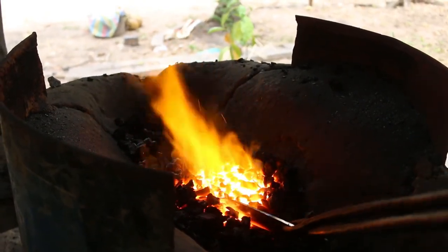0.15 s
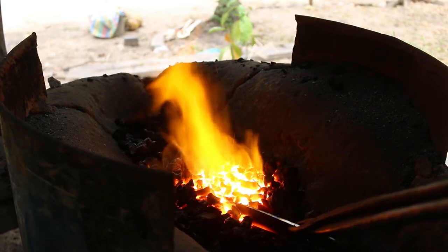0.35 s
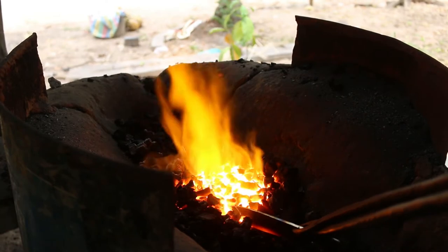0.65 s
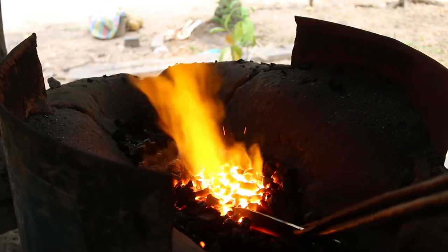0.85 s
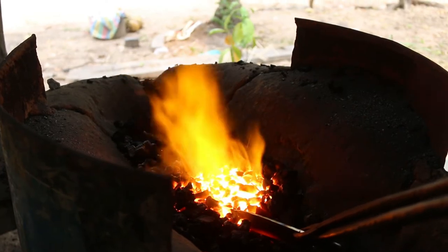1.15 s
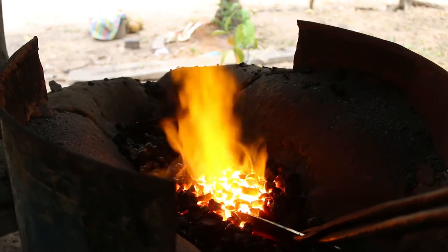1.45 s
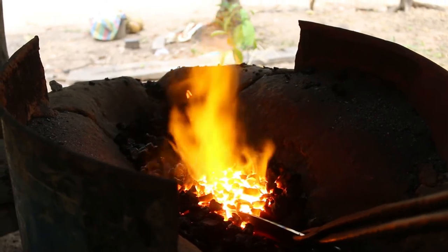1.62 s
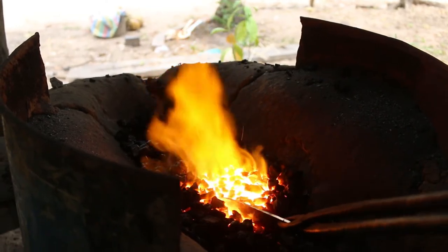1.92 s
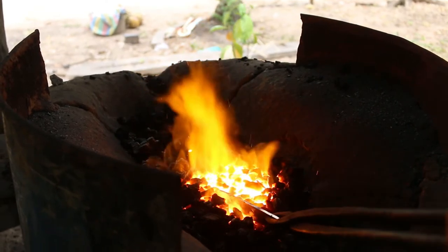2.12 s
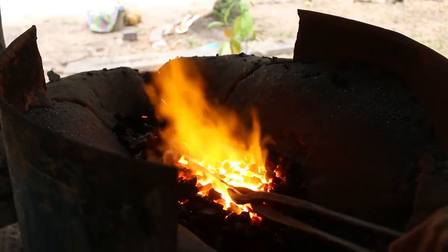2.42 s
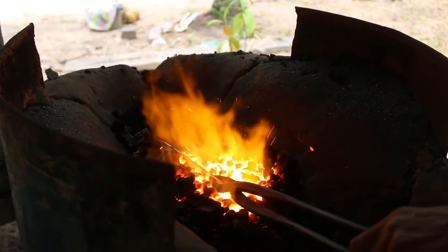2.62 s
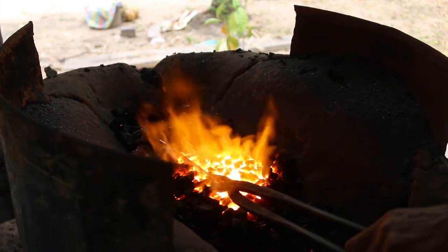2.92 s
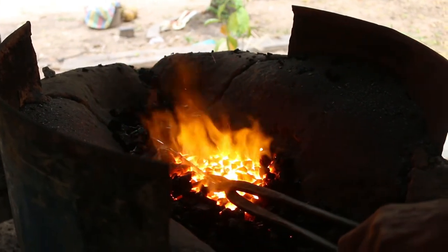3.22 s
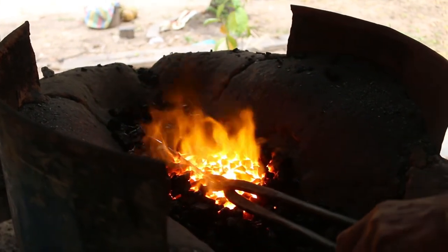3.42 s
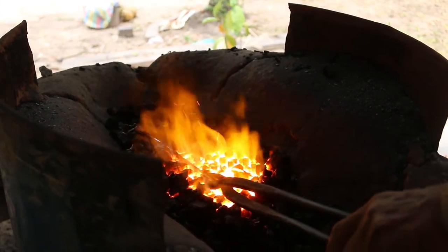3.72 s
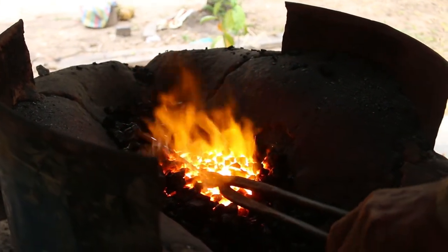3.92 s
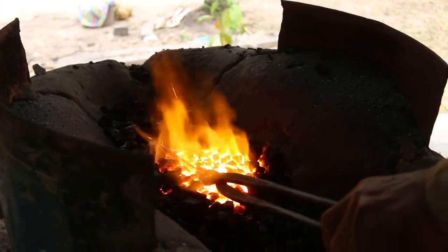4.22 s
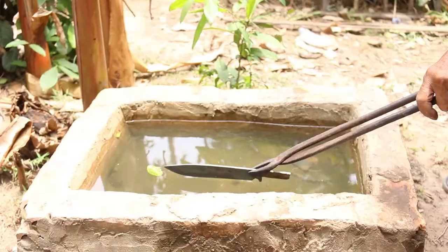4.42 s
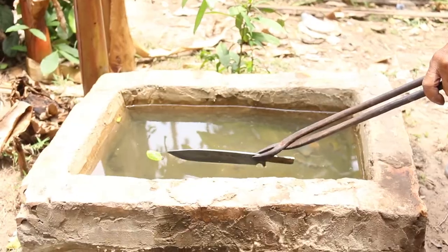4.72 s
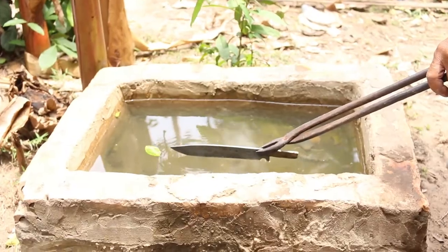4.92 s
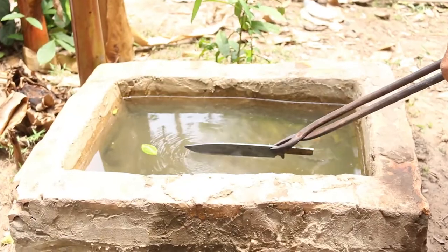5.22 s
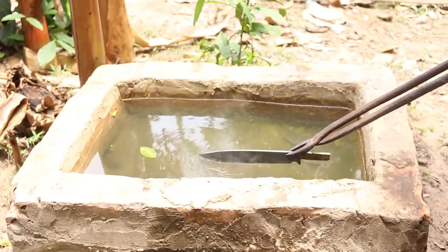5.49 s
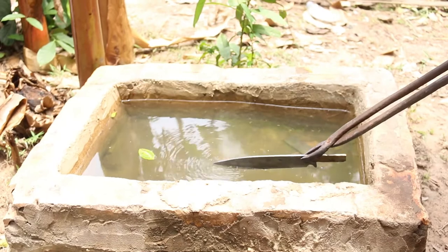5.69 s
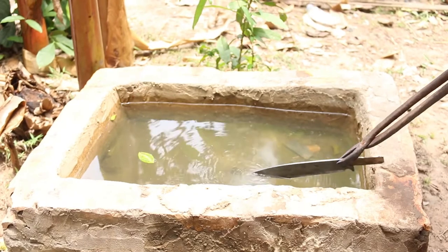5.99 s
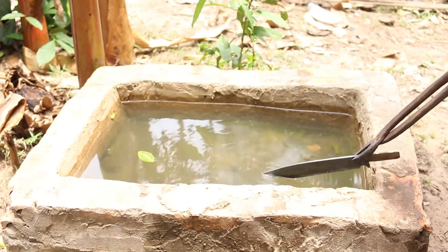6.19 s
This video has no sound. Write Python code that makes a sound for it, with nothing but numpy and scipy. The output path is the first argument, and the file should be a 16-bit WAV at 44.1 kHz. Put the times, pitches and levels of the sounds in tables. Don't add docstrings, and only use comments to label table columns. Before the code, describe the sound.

A forge blower roars and whines close by, then abruptly gives way to a quieter yard where hot steel hisses in water over a puttering engine.

```python
import sys
import numpy as np
from scipy import signal
from scipy.fft import rfft, irfft, next_fast_len
from scipy.io import wavfile
from scipy.ndimage import uniform_filter1d, map_coordinates

SR = 44100
rng = np.random.default_rng(int(sys.argv[2]) if len(sys.argv) > 2 else 0)


def transcribe(signal):
    frames = np.atleast_2d(signal).T
    limited = np.clip(frames, -1, 1)
    pcm = np.round(limited * 32767).astype(np.int16)
    wavfile.write(sys.argv[1], SR, pcm)


def volts_from_db(level):
    exponent = np.asarray(level, float) / 20
    return 10 ** exponent


N = 280031
T = np.arange(N) / SR
CHANGE_S = 4.4065
NEAR = T < CHANGE_S

# frequency in Hz, level in dB.
WIND_COLOUR = [(10, -4), (30, 0), (60, -11), (120, -4.5), (200, -33), (300, -120)]
# centre in seconds, half width in seconds, change in dB.
WIND_GUSTS = [
    (3.15, .3, 7),
    (3.85, .35, 13),
    (4.3, .08, -8),
    (5.11, .05, 13),
]
# frequency in Hz, level in dB per Hz.
YARD_AIR = [(20, -10), (90, -9), (150, -10), (200, -4.5), (350, -8), (700, -5), (1000, -12.5), (3000, -28),
            (8000, -40)]
# centre in Hz, width in Hz, level in dB.
EXHAUST_PIPE = [(143, 52, 0), (207, 44, -0.5), (335, 82, -3.5), (715, 400, -22.5)]
# frequency in Hz, level in dB per Hz.
TIN_HISS = [(1200, -43), (2000, -0.5), (3000, -8), (3900, -13.5), (4500, -9.5), (5800, -10), (6500, -18.5),
            (7000, -20.5), (8000, -17.5), (9300, -17.5), (10500, -20.5), (11800, -22.5), (12600, -28),
            (15600, -32.5)]
# frequency in Hz, level in dB per Hz.
KNOCK_COLOUR = [(1500, -36), (2500, -4), (3900, -5), (5000, 1.5), (6300, -2), (7200, -18.5), (8500, -7),
                (10000, -3), (11500, -7.5), (12500, -13), (15600, -15)]
# time in seconds, peak in dB.
HARD_KNOCKS = [(0.0997, -34), (0.1635, -35), (0.2319, -30), (0.3142, -36), (0.6624, -32), (0.8365, -33),
               (1.2421, -34), (1.3229, -29), (1.5908, -44), (1.659, -31), (2.0088, -33), (2.0757, -31),
               (2.17, -37), (2.6663, -30), (2.7506, -35), (2.8434, -41), (2.9243, -35), (3.0859, -27),
               (3.1921, -44), (3.258, -35), (3.3423, -35), (3.4236, -33), (3.5289, -30), (3.5942, -33)]
# centre in seconds, length in seconds, rise in dB.
SPARK_FLARES = [
    (0.05, .3, 11),
    (.102, .012, 9),
    (.407, .01, 16),
    (2.1, .25, 10),
    (2.55, .46, 15),
    (4.36, .12, 11),
]
# frequency in Hz, level in dB per Hz.
NEAR_ROAR = [(15, -58), (60, -19.5), (170, -13), (230, -7.5), (330, -3.5), (450, -1.5), (600, -2.5),
             (900, -4), (1150, -4.5), (1550, -7.5), (1750, -12.5), (2300, -17), (3500, -26), (8800, -80)]
# frequency in Hz, level in dB per Hz.
FAR_ROAR = [(15, -53), (90, -35), (130, -6), (250, -14.5), (450, -11.5), (900, -11), (1100, -17),
            (1860, -20.5), (2600, -25), (6000, -34.5), (15600, -40)]
# multiple of the shaft rate, level in dB rms.
SHAFT_TONES = [(3, -47), (6, -33.5), (10, -44), (11, -44.5), (12, -33.5), (13, -44.5), (18, -45.5),
               (21, -49)]
# frequency in Hz, level in dB rms.
HOUSING_WHISTLES = [(4511, -61), (5012, -59), (5389, -63), (8403, -67.5), (8780, -66)]
# centre in Hz, width in Hz, level in dB.
YARD_RESONANCES = [(428, 66, -42), (360, 36, -46), (848, 60, -41)]
# centre in Hz, width in Hz, level in dB.
TANK_RIDGES = [
    [(1420, 170, -5.5), (1990, 170, -5.5), (2860, 230, -5), (3620, 190, -1.5), (4400, 300, -10),
     (5450, 180, -4.5), (6190, 270, 0.3), (7200, 240, -6), (8060, 300, -3.5), (8830, 300, -2),
     (13400, 1900, -0.5)],
    [(1370, 210, -8), (2840, 330, -7), (3680, 220, -6), (5400, 250, -12), (6400, 260, 3), (7280, 250, -0.5),
     (8100, 300, -7), (9000, 300, -2), (13300, 1900, -4)],
    [(1370, 260, -5), (2800, 180, -1.5), (3730, 240, -7), (5420, 200, -4.5), (6440, 250, -7),
     (7440, 250, -3), (8390, 250, -1), (9200, 400, -2), (9800, 300, -5), (13400, 1600, -1)],
]
# frequency in Hz, level in dB per Hz.
STEAM_COLOUR = [(500, -35), (1000, -6.5), (1400, -2), (3000, -3), (6000, -2.5), (10000, -6.5),
                (13000, -1.5), (15800, 3.5)]
# time in seconds, vigour in dB, bubble size in dB.
BOIL_COURSE = [
    (4.49, -41, 0),
    (4.525, -15, -2),
    (4.69, -11.5, 0),
    (4.75, -1, -3.5),
    (4.93, .6, -1.5),
    (5.22, .2, 3),
    (5.41, -2.2, -1.5),
    (5.75, -.8, .2),
    (6.22, -1.9, -1),
]
# low edge in Hz, high edge in Hz, level in dB,
# growth with vigour (ratio), growth with bubble size (ratio).
BUBBLE_LAYERS = [
    (8350, 17700, -27, 1.05, -0.39),
    (4840, 9700, -27, 1.43, 0.17),
    (2930, 4400, -35, 0.78, 0.85),
    (770, 2290, -41, 0.6, .3),
]
# time in seconds, peak in dB, 60 dB decay in seconds beyond a basic 0.082.
FIRST_SPIT = [
    (4.597, -22.5, 0.03),
]
# frequency in Hz, level in dB per Hz.
SPIT_COLOUR = [(880, -39), (1500, -7), (2180, -29), (2350, -5), (2600, -5), (2950, -2), (4070, -11),
               (5200, -9.5), (5630, -13), (6780, -4.5), (15600, -8)]
# centre in seconds, low edge in Hz, high edge in Hz, level in dB.
STEREO_SPLITS = [(3.73, 8300, 9700, -56), (4.8, 7400, 9700, -34), (4.99, 13700, 15200, -35),
                 (5.22, 6900, 9000, -33), (5.22, 13000, 14600, -35), (5.64, 11000, 13900, -34),
                 (5.87, 14500, 15700, -36), (6.17, 11000, 13200, -36), (6.17, 4200, 5300, -39)]

SHAFT_HZ, OFF_S, COAST_S = 74.29, 4.6, 2.5
FIRING_HZ = 11.9
SAG_DB_PER_S = 0.28


def unit(x):
    return x / np.sqrt(np.mean(x ** 2) + 1e-20)


def along(points, hz):
    f, v = np.transpose(points)
    return np.interp(np.log(hz + 1), np.log(f + 1), v)


def wobble(rate):
    knots = rng.standard_normal(int(N * rate / SR) + 4)
    coarse_t = T[::64]
    return np.interp(T, coarse_t, map_coordinates(knots, [coarse_t * rate]))


def filtered(x, response):
    m = next_fast_len(N + SR // 2)
    return irfft(rfft(x, m) * response(np.fft.rfftfreq(m, 1 / SR)), m)[:N]


def band(x, lo_hz, hi_hz):
    return unit(filtered(x, lambda f: 1 / np.sqrt((1 + (lo_hz / (f + 1)) ** 8) * (1 + (f / hi_hz) ** 8))))


def rush(spectrum, patchy_db, source=None):
    if source is None:
        source = rng.standard_normal(N)
    z = signal.stft(source, nperseg=512)[2]
    field = uniform_filter1d(rng.standard_normal(z.shape), size=6, axis=0)
    field = uniform_filter1d(field, size=10, axis=1)
    x = signal.istft(z * volts_from_db(patchy_db * unit(field)), nperseg=512)[1][:N]
    return unit(filtered(x, lambda hz: volts_from_db(along(spectrum, hz))))


def fall(seconds, t60):
    return volts_from_db(-60 * T[:int(seconds * SR)] / t60)


def bump(f, centre, width):
    return 1 / (1 + (2 * (f - centre) / width) ** 2)


def wind():
    db = np.where(NEAR, -58.5, -65)
    db = db + sum(up_db * np.exp(-((T - s) / wide) ** 2) for s, wide, up_db in WIND_GUSTS)
    return volts_from_db(db + 1.5) * unit(volts_from_db(2.2 * wobble(8)) * rush(WIND_COLOUR, patchy_db=3.0))


def yard_air():
    return ~NEAR * volts_from_db(-50.5) * rush(YARD_AIR, patchy_db=0.0)


def pipe(f):
    return sum((-1) ** k * volts_from_db(db) * 1j * f * w / (c * c - f * f + 1j * f * w)
               for k, (c, w, db) in enumerate(EXHAUST_PIPE))


def engine():
    crank_hz = 2 * FIRING_HZ
    times = 6.331 - np.arange(int(crank_hz * 6.3)) / crank_hz
    luck = rng.standard_normal((len(times), 2))
    stronger = (-1) ** np.arange(len(times))
    puffs = np.zeros(N)
    puffs[((times + .0004 * luck[:, 0]) * SR).astype(int)] = volts_from_db(0.83 * luck[:, 1] + .4 * stronger)
    gate = signal.fftconvolve(puffs, fall(.1, 0.063))[:N]
    gas = unit(puffs) + .3 * unit(gate * rng.standard_normal(N))
    echoes = rng.standard_normal(SR // 5) * fall(.2, 0.45)
    gas += 0.85 * unit(signal.fftconvolve(gas, echoes)[:N])
    tank_db = -46.5 - 6.5 * np.exp(-np.clip(T - CHANGE_S, 0, None) / .3)
    return volts_from_db(np.where(NEAR, -50, tank_db)) * band(filtered(-gas, pipe), 120, 2000)


def clatter():
    knock_hz = 74.3
    firing = np.cos(2 * np.pi * FIRING_HZ * T - .07)
    times = .0025 + np.arange(int(knock_hz * CHANGE_S)) / knock_hz
    luck = rng.standard_normal((len(times), 2))
    knocks = np.zeros(N)
    knocks[np.abs((times + .0011 * luck[:, 0]) * SR).astype(int)] = volts_from_db(np.clip(1.7 * luck[:, 1], -5, 3))
    knocks *= volts_from_db(6 * np.tanh(2 * firing) - 5)
    for s, db in HARD_KNOCKS:
        knocks[round(s * SR)] += volts_from_db(db + 31)
    ring = fall(.1, .04) * (1 - np.exp(-T[:SR // 10] / .002))
    shake = signal.fftconvolve(knocks, ring)[:N]
    tin = rush(KNOCK_COLOUR, patchy_db=1.6, source=shake * rng.standard_normal(N))
    tin /= np.std(tin[NEAR])
    turning = np.cos(2 * np.pi * (T - .0046) * knock_hz)
    hiss = volts_from_db(1.1 * firing + 1.3 * turning) * rush(TIN_HISS, patchy_db=1.2)
    spark_db = -25 + sum(db / (1 + (2 * (T - s) / long) ** 6) for s, long, db in SPARK_FLARES)
    sparks = band(volts_from_db(2.2 * wobble(25)) * rng.standard_normal(N), 12000, 16000)
    level = volts_from_db(-41.5 - SAG_DB_PER_S * T + 0.28 * wobble(2.9))
    return NEAR * level * (volts_from_db(-2.5) * tin + volts_from_db(5.0) * hiss + volts_from_db(spark_db) * sparks)


def yard(f):
    return sum(volts_from_db(db) * bump(f, c, w) for c, w, db in YARD_RESONANCES)


def blower():
    speed = np.exp(-np.clip(T - OFF_S, 0, None) / COAST_S)
    turn = 2 * np.pi * SHAFT_HZ * np.cumsum(speed) / SR
    near_db = -24 - SAG_DB_PER_S * T + 0.18 * wobble(1.33) + 0.28 * np.cos(turn - .1) + 0.48 * wobble(9.02)
    roar = volts_from_db(near_db) * rush(NEAR_ROAR, patchy_db=0.24)
    far_db = -40 + 6 * np.exp(-np.abs(T - CHANGE_S) / .022) + 0.96 * wobble(7.6)
    far = volts_from_db(far_db) * speed ** 3 * rush(FAR_ROAR, patchy_db=0.5)
    tones = sum(volts_from_db(db + 3 + .9 * wobble(7)) * np.sin(round(k) * turn + .3 * wobble(8)) for k, db in SHAFT_TONES)
    tones += sum(volts_from_db(db + 5.5 + 1.4 * wobble(11)) * np.sin(2 * np.pi * hz * T + 3.6 * wobble(12))
                 for hz, db in HOUSING_WHISTLES)
    dying = sum(volts_from_db(1.6 * wobble(15)) * yard(k * SHAFT_HZ * speed) * np.sin(k * turn)
                for k in (6, 12))
    return np.where(NEAR, roar + tones, far + speed ** 2.2 * dying)


def tank(x):
    drift = .5 * (5.2 - T)
    draw = 2 * np.clip((T - 5.2) / (6.0 - 5.2), 0, 1) ** 1.7
    place = np.clip(np.maximum(drift, draw), 0, 2)

    def ridges(f, peaks):
        return np.sqrt(volts_from_db(-22) + sum(volts_from_db(2 * db) * bump(f, c, w) for c, w, db in peaks))

    return sum(np.clip(1 - np.abs(place - k), 0, 1) * unit(filtered(x, lambda f: ridges(f, peaks)))
               for k, peaks in enumerate(TANK_RIDGES))


def spit():
    out = np.zeros(N)
    for s, db, t60 in FIRST_SPIT:
        age = np.clip(T - s + .001, 0, None)
        burst = volts_from_db(db - 1.0 - 60 * age / (t60 + 0.082)) * (1 - np.exp(-age / .0012))
        out += burst * rush(SPIT_COLOUR, patchy_db=0.5)
    return out


def quench():
    s, vigour, size = np.transpose(BOIL_COURSE)
    pops = (rng.random(N) < 3000 / SR) * rng.standard_normal(N)
    crackle = volts_from_db(0.45 * wobble(40)) * rng.standard_normal(N) + 0.18 * unit(pops)
    boil = tank(rush(STEAM_COLOUR, patchy_db=0.95, source=crackle))
    build_db = -2.1 * np.exp(-np.clip(T - s[3], 0, None) / 0.38)
    lift_s, knee_s, lift_db_per_s = 6.252, .022, 270
    lift_db = lift_db_per_s * (T - lift_s + np.hypot(T - lift_s, knee_s)) / 2
    hiss = np.zeros(N)
    for k, (lo_hz, hi_hz, db, grows, coarse) in enumerate(BUBBLE_LAYERS):
        layer_db = db + grows * np.interp(T - k * 0.016, s, vigour)
        layer_db += coarse * np.interp(T, s, size) + k * build_db
        layer_db -= (1 - k * .11) * lift_db
        hiss += volts_from_db(layer_db) * band(boil, lo_hz, hi_hz)
    return ~NEAR * (volts_from_db(0.62 * wobble(5)) * hiss + spit())


def scene():
    return np.tile(wind() + yard_air() + engine() + clatter() + blower() + quench(), (2, 1))


def low_pass(x):
    return signal.sosfilt(signal.butter(12, 15740, fs=SR, output="sos"), x)


def record(dry):
    side = np.zeros(N)
    for s, lo, hi, db in STEREO_SPLITS:
        noise = unit(filtered(rng.standard_normal(N), lambda hz: (hz > lo) & (hz < hi)))
        side += volts_from_db(db) * np.exp(-((T - s) / .013) ** 4) * noise
    both = filtered(dry[0], lambda hz: hz < 15800) + np.array([side, -side])
    return low_pass(both)


dry = scene()
out = record(dry)
transcribe(out)
```